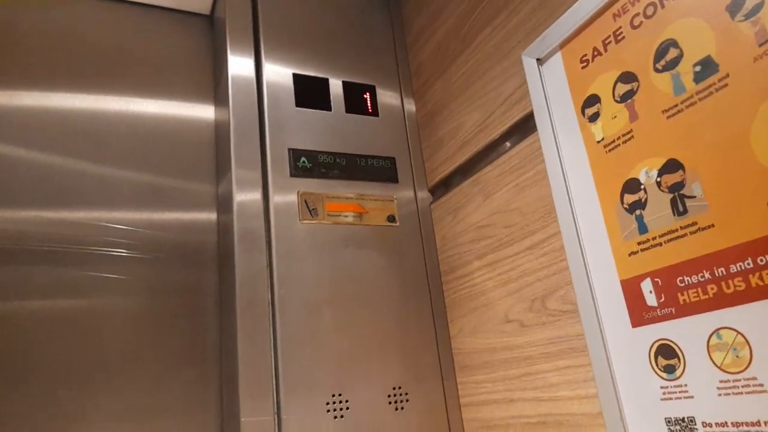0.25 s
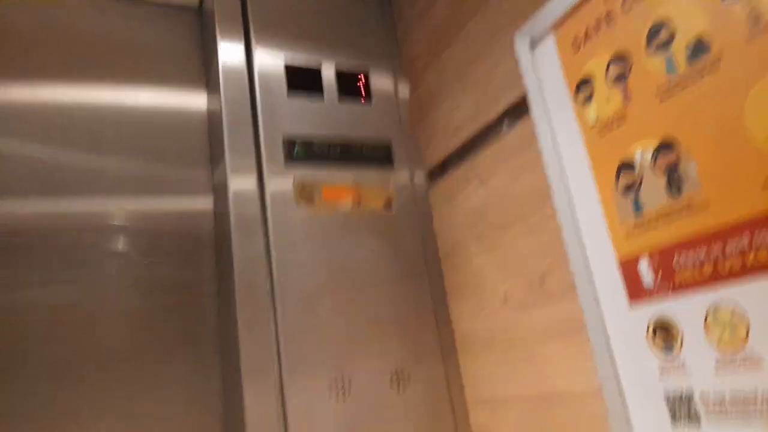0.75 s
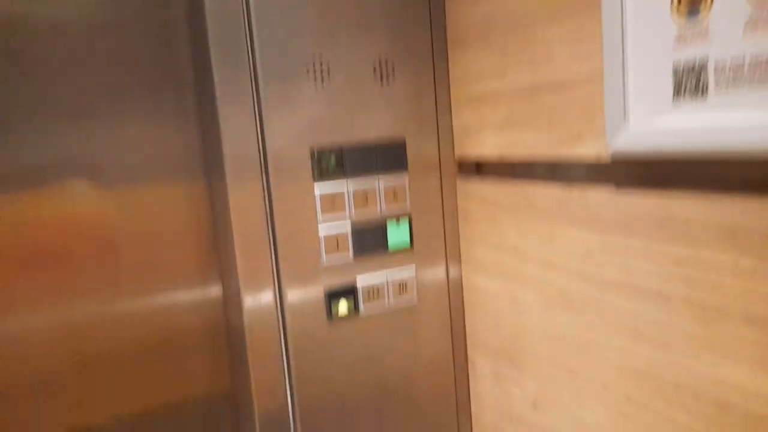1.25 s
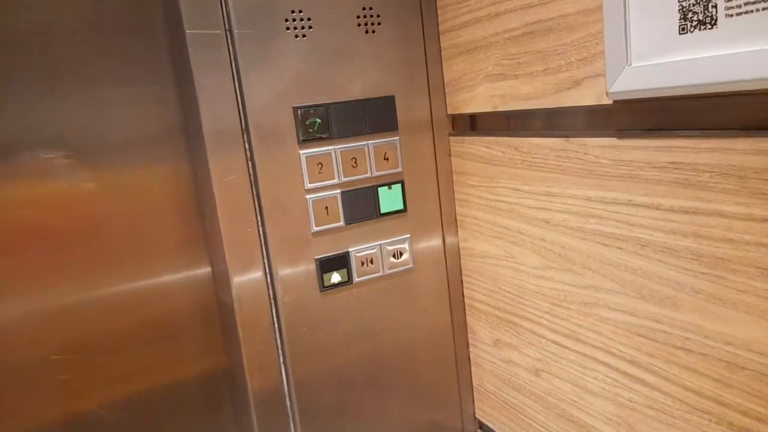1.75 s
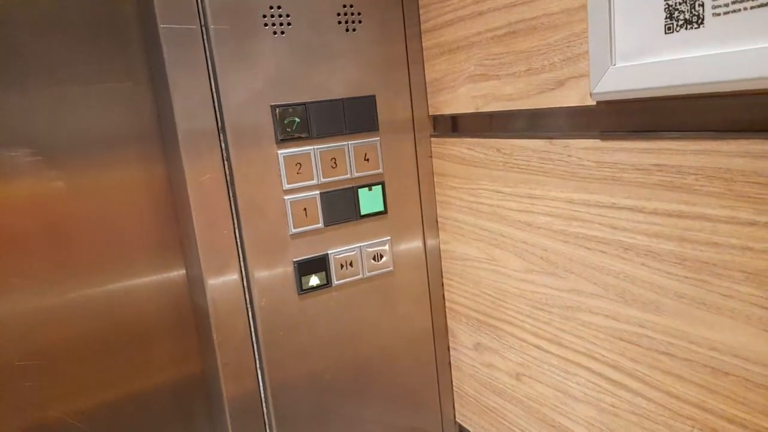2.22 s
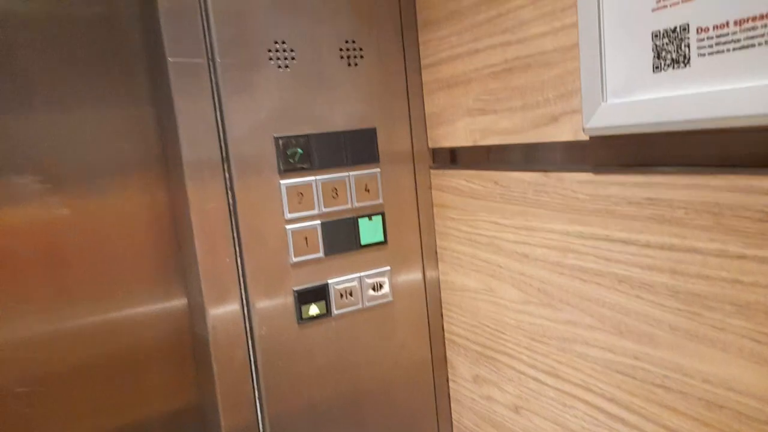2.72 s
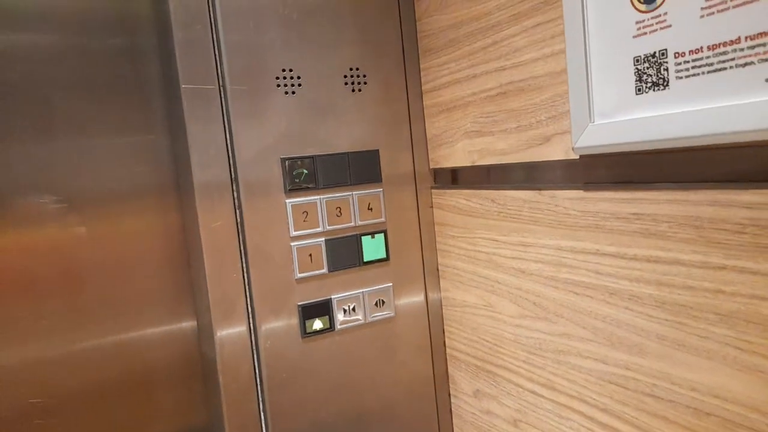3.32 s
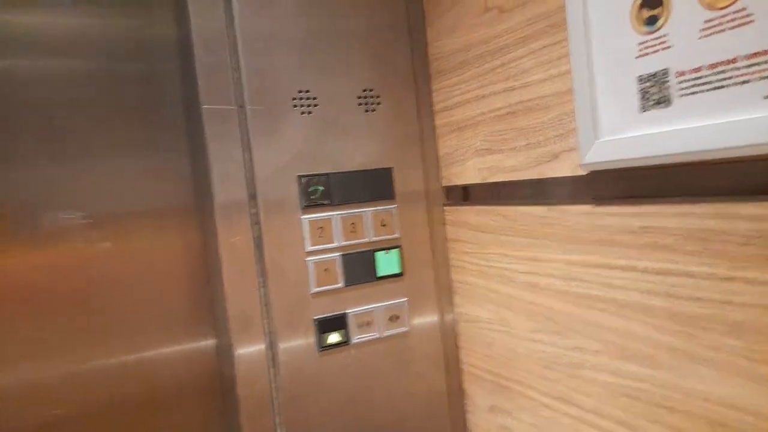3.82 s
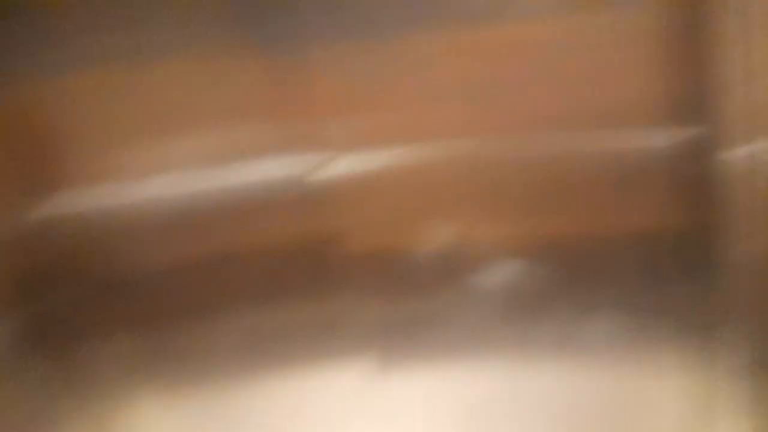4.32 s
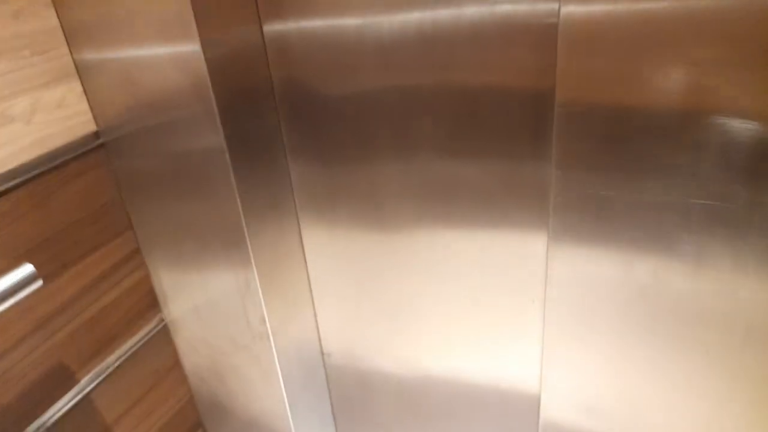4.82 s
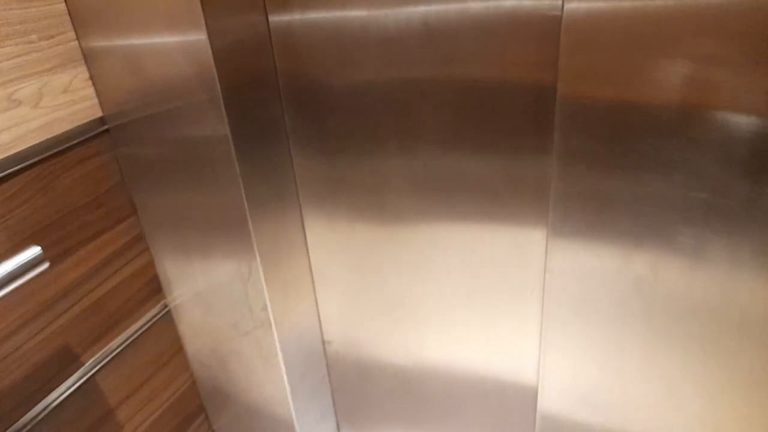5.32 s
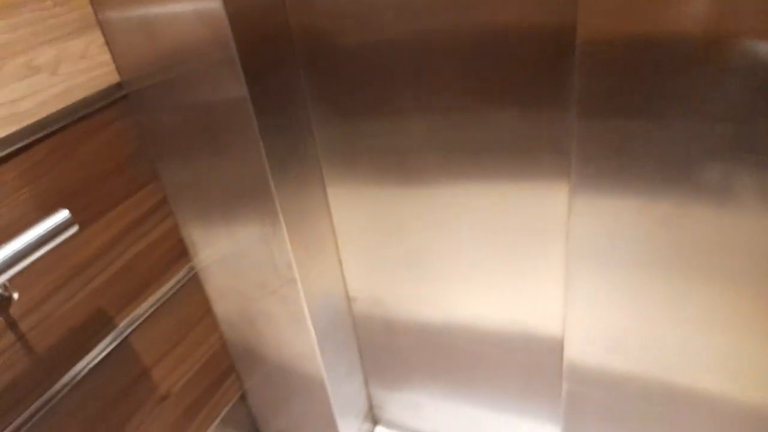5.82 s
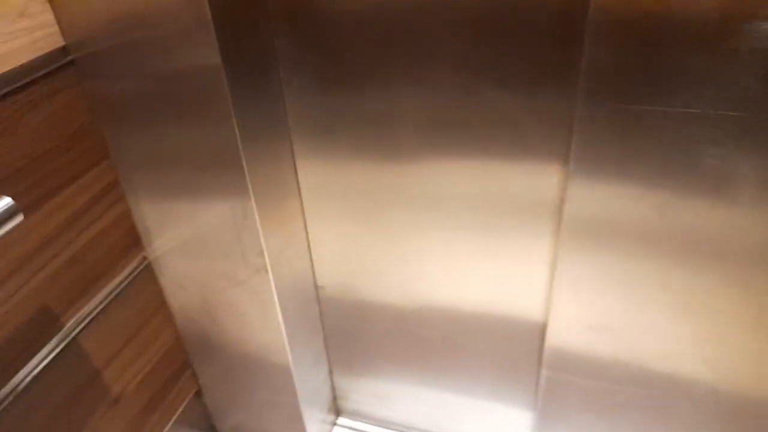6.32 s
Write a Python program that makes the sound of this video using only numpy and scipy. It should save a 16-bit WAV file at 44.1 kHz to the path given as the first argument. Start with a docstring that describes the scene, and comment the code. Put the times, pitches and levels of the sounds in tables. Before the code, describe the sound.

A closed elevator rides along: a dense, wavering hum from fan and motor, hollow duct air and low rumbling fill the tight, resonant car. Low creaky groans come and go, with soft bumps from the rails. The deep boom fades and the rumble eases after the microphone turns to the doors, where a wall panel drones softly and cloth brushes close, hissing brightest near the end.

```python
"""Inside a small travelling elevator car: a hand-held microphone pair turns from floor display to panel to shut doors.
The fan and electrics are sums of wavering sines; the fan's draught is noise shaped by its duct.
Rail noise and thuds excite low resonances of the car, a wall panel drones, and the guides groan in bouts.
Close by, cloth hisses in strokes of shaped noise, loudest after the turn, with narrow gliding rasps."""
import sys
import numpy as np
from scipy import signal
from scipy.fft import rfft, irfft
from scipy.io import wavfile

SR = 44100
rng = np.random.default_rng(int(sys.argv[2]) if len(sys.argv) > 2 else 0)


def put_to_file(sound):
    """Save the sound as 16-bit audio at rate SR, in the file named by the first command-line argument."""
    columns = np.atleast_2d(sound).T  # one column per channel
    safe = np.clip(columns, -1, 1)
    whole_steps = np.round(safe * 32767)
    wavfile.write(sys.argv[1], SR, whole_steps.astype(np.int16))


N = 289296
TIME = np.arange(N) / SR
BINS = np.maximum(np.arange(N // 2 + 1) * SR / N, 1)  # Hz, kept above 0 for the logarithm


def undb(db):
    """Decibels to gain."""
    return 10 ** (np.asarray(db) / 20)


def curve(rows):
    """Rows (time_s, value) joined by straight lines."""
    return np.interp(TIME, *np.transpose(rows))


def colour(rows, hz=BINS):
    """Gains of rows (freq_hz, level_db, ..) on a log-frequency axis, one line for each dB column."""
    points, *columns = np.transpose(rows)
    return undb([np.interp(np.log(hz), np.log(points), db) for db in columns])


def tilt(right_db):
    """Left and right gains that make the right side louder by right_db."""
    return undb([[-right_db / 2], [right_db / 2]])


def walk(rate_hz):
    """Smooth random curve with a spread near 1, changing rate_hz times a second."""
    steps = signal.resample_poly(rng.standard_normal(512), 16, 1)
    return np.interp(TIME * rate_hz * 16, np.arange(len(steps)), steps)


def swell(peak_s, rise_s, fall_s, shape=2):
    """Rise and fall, at half height rise_s before and fall_s after the peak; a higher shape has a flatter top."""
    side_s = np.where(TIME < peak_s, rise_s, fall_s)
    return 2 ** -(np.abs((TIME - peak_s) / side_s) ** shape)


def ring(peak_s, length_s, hz, db):
    """One resonance swells and dies away; its length is taken at half height."""
    envelope = swell(peak_s, length_s / 2, length_s / 2)
    return undb(db) * envelope * np.sin(2 * np.pi * (hz * TIME + rng.random()))


def noise(gain, alike_hz=650):
    """Stereo noise of a given density per Hz; long waves reach both microphones alike."""
    mid, side = rfft(rng.standard_normal((2, N)))
    alike = 1 / (1 + (BINS / alike_hz) ** 3)
    sides = np.array([[1], [-1]])
    pair = mid * np.sqrt(1 + alike) + side * np.sqrt(1 - alike) * sides
    return irfft(pair * gain, N) * np.sqrt(SR) / 2


def resonances(modes):
    """Gain at every frequency of a set of resonances (freq_hz, width_hz, level_db), added as powers."""
    power = 0
    for hz, width_hz, db in modes:
        offset = (BINS - hz) / (0.72 * width_hz)
        power = power + undb(db) ** 2 / (1 + offset ** 2) ** 2
    return np.sqrt(power)


def ripple(depth_db=5.5, spacing_hz=14, blur_hz=2500):
    """The hard-walled car lifts some frequencies and cancels others; in the treble its modes blur together."""
    steps = signal.resample_poly(rng.standard_normal((2, 4096)), 8, 1, axis=1)
    comb = np.array([np.interp(8 * BINS / spacing_hz, np.arange(len(row)), row) for row in steps])
    return undb(depth_db * comb / (1 + BINS / blur_hz))


def tone(hz, level, drift_s, at_node=False, waver_db=0.95, apart_hz=1100, node_rad=1.13):
    """Wavering sine of given rms; short waves, or a node between them, put the two microphones out of step."""
    start = np.pi * rng.uniform(-1, 1)
    # each microphone is shifted by this angle, in opposite directions
    shift = node_rad if at_node else min(hz / apart_hz, 1) * np.pi / 4
    lag = rng.choice([-1, 1]) * shift * np.array([[1], [-1]])
    phase = 2 * np.pi * hz * (TIME + drift_s) + start
    waver = undb(waver_db * min(hz / 120, 1) * walk(4.05))  # low tones waver less
    # sin(phase + lag), expanded
    sine = np.cos(lag) * np.sin(phase) + np.sin(lag) * np.cos(phase)
    return np.sqrt(2) * level * waver * sine


def heard_at(place, levels_db):
    """Left and right gain of a tone as the microphones move from the display past the panel to the doors."""
    gains = undb(levels_db).reshape(3, 2)
    return np.array([np.interp(place, np.arange(3), side) for side in gains.T])


# Strong fan tones; standing waves make them differ from place to place (before the upper-tone gain). Columns:
# order (multiple of the shaft rate), display_left_db, display_right_db,
# panel_left_db, panel_right_db, doors_left_db, doors_right_db
FAN_TONES = [(1, -56.2, -53.5, -56.2, -54.0, -56.6, -54.5), (2, -56.9, -54.0, -56.5, -53.9, -56.3, -53.9),
             (4, -62.2, -61.1, -59.4, -56.7, -62.2, -59.3), (5, -54.0, -48.5, -50.3, -46.3, -53.7, -48.6),
             (8, -63.7, -65.1, -55.7, -55.4, -59.1, -52.5), (9, -54.1, -53.1, -52.7, -50.3, -57.7, -52.2),
             (10, -57.2, -53.7, -56.1, -53.3, -55.3, -55.5), (13, -69.1, -58.7, -61.8, -57.5, -78.3, -63.0),
             (14, -58.1, -56.9, -60.0, -56.1, -58.1, -54.1), (15, -57.6, -58.1, -57.2, -61.2, -60.3, -52.0),
             (22, -62.8, -62.7, -58.2, -64.2, -53.8, -57.5), (23, -69.9, -58.6, -58.3, -55.8, -59.7, -51.5),
             (26, -68.0, -67.4, -65.2, -65.1, -63.4, -57.2), (27, -60.7, -56.8, -65.6, -54.6, -63.5, -56.9),
             (28, -71.5, -63.7, -64.5, -64.5, -64.4, -65.8), (29, -67.2, -67.6, -68.0, -69.7, -67.2, -57.6),
             (31, -72.2, -64.7, -75.9, -65.6, -71.6, -56.4), (36, -67.2, -70.0, -70.8, -71.3, -69.5, -65.6),
             (42, -77.4, -81.6, -82.5, -63.4, -72.1, -78.3), (47, -70.7, -73.1, -73.0, -58.4, -77.2, -69.0),
             (51, -96.0, -84.9, -75.0, -69.4, -89.4, -85.4), (57, -80.8, -73.6, -67.0, -69.5, -73.1, -75.0),
             (59, -82.8, -74.9, -80.2, -85.2, -95.7, -76.9), (62, -84.3, -71.6, -88.8, -77.5, -74.9, -71.4),
             (64, -82.8, -76.2, -78.0, -75.4, -75.7, -74.1)]
# Typical level of the faint overtones, before scatter and upper-tone gain. Columns: freq_hz, level_db
FAINT_OVERTONES = [(380, -74), (750, -72), (1000, -79), (1550, -80), (1700, -87), (2500, -91)]
# The third multiple booms in the car and fades, before a small trim. Columns: time_s, level_db
FAN_BOOM = [(0.1, -40), (1.75, -44.5), (4.24, -44.5), (4.33, -47), (6.4, -59.5)]
SHAFT_HZ = 24.152
NODE_ORDER = 22  # the multiple whose standing wave has a node between the two microphones


def fan(place, drift_s=.00004, uneven_db=3, boom_trim_db=-1.0, faint_right_db=4):
    """Multiples of the shaft rate: a boom, strong tones and a comb of faint uneven overtones."""
    drift = drift_s * walk(2.01)
    strong = {round(order): heard_at(place, levels) for order, *levels in FAN_TONES}
    strong[3] = undb(curve(FAN_BOOM) + boom_trim_db + np.zeros((2, 1)))
    out = 0
    for order in range(1, 85):
        hz = order * SHAFT_HZ
        scatter_db = uneven_db * rng.standard_normal((3, 2)) + faint_right_db / 2 * np.array([-1, 1])
        faint = colour(FAINT_OVERTONES, hz) * heard_at(place, scatter_db)
        out += tone(hz, strong.get(order, faint), drift, order == NODE_ORDER)
    return out


# Electrical hum and motor whine, before the upper-tone gain. Columns: freq_hz, display_left_db,
# display_right_db, panel_left_db, panel_right_db, doors_left_db, doors_right_db
MOTOR_TONES = [(100, -52.4, -51.4, -54.0, -52.1, -63.8, -64.9),
               (200, -41.8, -41.9, -43.8, -42.9, -46.7, -44.7),
               (265.6, -66.4, -69.3, -61.9, -62.2, -51.5, -52.7),
               (300, -55.9, -51.5, -54.2, -48.7, -57.3, -53.8),
               (350, -54.8, -48.2, -55.9, -53.8, -49.3, -49.7),
               (558.2, -78.2, -57.8, -66.7, -56.6, -57.7, -62.2),
               (607, -61.2, -54.3, -64.8, -74.3, -62.2, -59.4),
               (703.8, -63.8, -67.7, -64.4, -62.4, -66.2, -61.8),
               (706.5, -63.3, -60.7, -64.2, -56.9, -66.2, -61.3),
               (731.6, -67.5, -67.0, -59.5, -57.5, -56.9, -63.4),
               (812, -65.6, -64.3, -71.8, -63.7, -70.5, -65.7),
               (940, -85.3, -80.2, -86.2, -74.2, -64.8, -65.7),
               (1111, -68.3, -72.0, -70.5, -71.3, -66.5, -68.6)]
BEAT_HZ = 350  # the one hum that swells slowly
BEAT_PERIOD_S, BEAT_PEAK_S, BEAT_DEPTH = 1.193, 3.08, 0.31


def motor(place, drift_s=.00003):
    """Mains hum and the whine of the drive; close pairs beat, and one hum swells slowly."""
    drift = drift_s * walk(1.8)
    beat = 1 + BEAT_DEPTH * np.cos(2 * np.pi * (TIME - BEAT_PEAK_S) / BEAT_PERIOD_S)
    beat = beat / np.sqrt(np.mean(beat ** 2))  # keeps the rms level
    out = 0
    for hz, *levels in MOTOR_TONES:
        level = heard_at(place, levels)
        if hz == BEAT_HZ:
            level = level * beat
        out += tone(hz, level, drift)
    return out


# Gain of the upper tones of fan and motor. Columns: time_s, gain_db
UPPER_TONES = [(0, -2), (1.4, -1), (5.4, 1), (6.1, -2), (6.56, -0.5)]


def machinery(place, split_hz=330):
    """Fan and motor together; their short waves swell and fade with small moves of the microphones."""
    tones = fan(place) + motor(place)
    low = signal.sosfiltfilt(signal.butter(4, split_hz, fs=SR, output="sos"), tones)
    upper = tones - low
    return low + upper * undb(curve(UPPER_TONES))


# Smooth rush from the fan, density before trim and ripple. Columns: freq_hz, left_db_per_hz, right_db_per_hz
AIR_RUSH = [(25, -103, -98), (59.6, -103.5, -72), (291, -69.5, -73.5), (412, -83.5, -85.5),
            (500, -76.5, -78), (815, -83, -80.5), (950, -90.5, -86), (1410, -94, -88), (1810, -93.5, -94),
            (2250, -100.5, -91), (2700, -105, -96), (3240, -113, -101), (4070, -113, -100),
            (6030, -118, -108), (9770, -110, -107), (12400, -117, -116)]
# Resonances of the fan duct, densities before trim and ripple.
# Columns: freq_hz, width_hz, panel_db_per_hz, doors_db_per_hz
DUCT_MODES = [(327, 50, -91, -70), (422, 47, -84, -76), (490.6, 18, -73, -68), (533, 80, -81, -80),
              (623, 95, -94, -83.5), (810.4, 33.5, -75.5, -77), (886, 15, -88, -79.5),
              (1103, 160, -88.5, -89.5), (1320, 180, -94.5, -96)]
# Brief lifts of the hollow duct sound. Columns: peak_s, half_length_s (to half the lift), lift_db
DUCT_DRAUGHTS = [(0.66, 0.15, 3.8), (6.25, .25, 2.8)]


def air(turn, flutter_db=0.8, rush_db=-0.25, duct_panel_db=-0.4, duct_doors_db=-1.0):
    """The fan's draught: a smooth rush, and a hollow duct sound whose colour changes on the way to the doors."""
    draught_db = sum(db * swell(s, half_s, half_s) for s, half_s, db in DUCT_DRAUGHTS)
    rush = noise(colour(AIR_RUSH) * ripple()) * undb(rush_db)
    panel_modes = [(hz, width, db) for hz, width, db, _ in DUCT_MODES]
    doors_modes = [(hz, width, db) for hz, width, _, db in DUCT_MODES]
    at_panel = noise(resonances(panel_modes) * ripple()) * undb(duct_panel_db)
    at_doors = noise(resonances(doors_modes) * ripple()) * undb(duct_doors_db)
    hollow = at_panel * np.sqrt(1 - turn) + at_doors * np.sqrt(turn)  # equal-power crossfade
    flutter = undb(flutter_db * walk(12))  # the flow is never quite even
    return (rush + hollow * undb(draught_db)) * flutter


# Resonances of the car shaken by the rails, density before trim, easing and stereo tilt.
# Columns: freq_hz, width_hz, level_db_per_hz
CAR_MODES = [(99, 11, -66), (119.6, 7.9, -59.5), (149, 6.5, -58.5), (166.3, 22.7, -56.5), (243, 9.3, -62.5),
             (273, 4.6, -68.5), (286, 12.8, -66)]


def rumble(level_db=-0.3, eases_s=4.3, ease_length_s=0.45, ease_db=-3.5):
    """Rail roughness shakes the car's low resonances, more gently late in the ride."""
    ease = curve([(eases_s, 0), (eases_s + ease_length_s, ease_db)])
    return noise(resonances(CAR_MODES)) * undb(level_db + ease)


# Colour of cloth hiss, before the stroke levels and ripple. Columns: freq_hz, left_db_per_hz, right_db_per_hz
CLOTH_COLOUR = [(500, -107, -105), (1510, -101, -83.5), (2620, -88, -84), (4300, -91.5, -82.5),
                (6450, -87, -87.5), (8030, -96.5, -81), (9800, -86, -84), (11900, -91, -85.5),
                (14300, -92, -91), (15500, -103, -102)]
# Strokes of cloth on cloth, relative to that colour. Columns: peak_s, rise_s, fall_s (to half height), peak_db
CLOTH_STROKES = [(.28, 0.059, 0.055, -22), (.55, 0.11, 0.08, -23), (1.22, 0.15, 0.19, -22),
                 (2.9, .15, 0.26, -25), (4.2, 0.18, 0.31, -21.5), (4.72, 0.21, 0.21, -10.5),
                 (5.76, .135, 0.077, -7.5), (5.858, 0.0045, 0.056, -1.5), (5.935, 0.061, 0.078, -3),
                 (6.2, 0.31, 0.26, -13), (6.45, .1, .15, -9.5)]
STIR_DB = -31  # the cloth never lies quite still; relative to the same colour


def clothing(grain_db=0.84, catch_db=0.7, shape=1.2):
    """Countless threads slip past each other in strokes: a fine-grained hiss that catches a little."""
    threads = np.repeat(rng.standard_normal(N // 32 + 1), 32)[:N]  # a new step every 32 samples
    power = undb(STIR_DB) ** 2
    for peak_s, rise_s, fall_s, db in CLOTH_STROKES:
        power = power + (undb(db) * swell(peak_s, rise_s, fall_s, shape)) ** 2
    grain = undb(grain_db * threads + catch_db * walk(45))
    return noise(colour(CLOTH_COLOUR) * ripple()) * np.sqrt(power) * grain


# Rubbing guides, in bouts about a second apart; level before stereo tilt and roughness, pitch before wobble.
# Columns: middle_s, length_s (at half height), peak_db, pitch_hz
GUIDE_GROANS = [(1.119, 0.026, -28.5, 168), (1.233, .05, -32, 171.2), (1.314, 0.035, -31.5, 169.2),
                (1.394, 0.061, -31.5, 170), (1.921, .03, -31.5, 169), (2, 0.058, -30, 166.7),
                (2.089, 0.06, -28.5, 169.4), (2.186, 0.064, -28, 172.4), (2.286, .05, -25.5, 172.7),
                (2.341, .03, -29.5, 172), (3.094, 0.037, -33, 166.8), (3.18, 0.037, -29, 165.4),
                (3.309, 0.066, -28.5, 170.9), (3.555, 0.077, -38, 167.2), (4.319, 0.2, -24, 160.8),
                (4.511, .18, -33, 160.1), (5.263, 0.21, -24, 161.8), (5.481, 0.086, -30, 163.3),
                (6.433, 0.18, -28, 163.3)]


def groan(wobble_hz=1.4, right_db=1.5, flat=4, graze_db=-9.5, graze_lengths=1.27):
    """The guides graze, press and let go, driving one car resonance: short judders first, then long groans."""
    force = 0
    for s, length, db, _ in GUIDE_GROANS:
        graze = undb(graze_db) * swell(s, graze_lengths * length, length / 2)
        press = swell(s, length / 2, length / 2, flat)
        force = np.maximum(force, undb(db) * np.maximum(graze, press))
    hz = curve([(s, pitch) for s, _, _, pitch in GUIDE_GROANS]) + wobble_hz * walk(20)
    roughness = 1 + .06 * walk(40)
    return force * roughness * np.sin(2 * np.pi * np.cumsum(hz) / SR) * tilt(right_db)


# Uneven spots on the rails, before stereo tilt. Columns: middle_s, length_s (at half height), peak_db
RAIL_BUMPS = [(1.426, 0.047, -37.5), (2.62, .06, -41), (4.643, .086, -37), (5.85, 0.26, -42),
              (6.101, .043, -37.5)]


def bumps(thud_hz=105.76):
    """Uneven spots on the rails thud in a low resonance of the car."""
    return sum(ring(s, length, thud_hz, db) for s, length, db in RAIL_BUMPS)


def panel_drone(first_s=4.72, period_s=.46, hz=263.5, length_s=0.15, first_db=-38, step_db=-4.5):
    """A wall panel near the doors drones three times in a row, each time softer."""
    return sum(ring(first_s + k * period_s, length_s, hz, first_db + k * step_db) for k in range(3))


# Folds of cloth zip past each other, falling in pitch as they slow; level before stereo tilt.
# Columns: start_s, end_s, first_hz, last_hz, rms_db
CLOTH_RASPS = [(5.727, 5.783, 3900, 3690, -62), (5.847, 5.89, 4630, 4300, -50.5),
               (5.89, 5.953, 4220, 3800, -54), (5.9, 5.965, 3080, 2700, -60)]


def rasps(half_width_hz=400, edge_s=0.0058, right_db=5):
    """Ribs of the weave rub past at a falling speed, heard as a narrow gliding band of hiss."""
    lowpass = signal.butter(2, half_width_hz, fs=SR, output="sos")
    parts = signal.sosfilt(lowpass, rng.standard_normal((2, 2, N)))
    spread = (parts[0] + 1j * parts[1]) / parts.std()
    out = 0
    for start, end, first_hz, last_hz, db in CLOTH_RASPS:
        gate = np.clip(np.minimum(TIME - start, end - TIME) / edge_s, 0, 1)
        phase = 2 * np.pi * np.cumsum(curve([(start, first_hz), (end, last_hz)])) / SR
        out = out + undb(db) * gate * np.real(spread * np.exp(1j * phase))  # moves the noise up to the pitch
    return out * tilt(right_db)


# Where the microphones point. Columns: time_s, place (0 at the display, 1 at the panel, 2 at the doors)
MICROPHONE_TURN = [(0, 0.26), (0.8, 0), (1.3, 1.18), (4.0, 0.82), (4.55, 2), (6.56, 2)]


def scene(car_right_db=2.5):
    """Everything that sounds in the car."""
    place = curve(MICROPHONE_TURN)
    to_doors = np.clip(place - 1, 0, 1)
    fan_and_drive = machinery(place) + air(to_doors)
    car = (rumble() + bumps() + panel_drone()) * tilt(car_right_db)
    return fan_and_drive + car + clothing() + groan() + rasps()


# Treble colour of the two microphone ports. Columns: freq_hz, left_db, right_db
MICROPHONE_PORTS = [(4350, -0.5, 0), (5000, -2, -3), (5770, -3.5, -0.5), (6970, -7.5, -3),
                    (7150, -15, -6.5), (7850, -14, -5.5), (8200, -1, -4), (9100, -12, -3),
                    (9450, 0.5, -1.5), (11150, -3.5, -2.5), (11800, 0.5, -7), (14400, -1, 0.5),
                    (14900, -8, -4.5)]
TOP_HZ = 15550


def record(dry):
    """The microphone ports colour the treble, the top is cut, and the ends fade briefly."""
    fade = np.clip(np.minimum(TIME, TIME[-1] - TIME) / .004, 0, 1)  # 4 ms
    coloured = irfft(rfft(dry * fade) * colour(MICROPHONE_PORTS), N)
    return signal.sosfilt(signal.ellip(10, .1, 80, TOP_HZ, fs=SR, output="sos"), coloured)


dry = scene()
out = record(dry)
put_to_file(out)
```